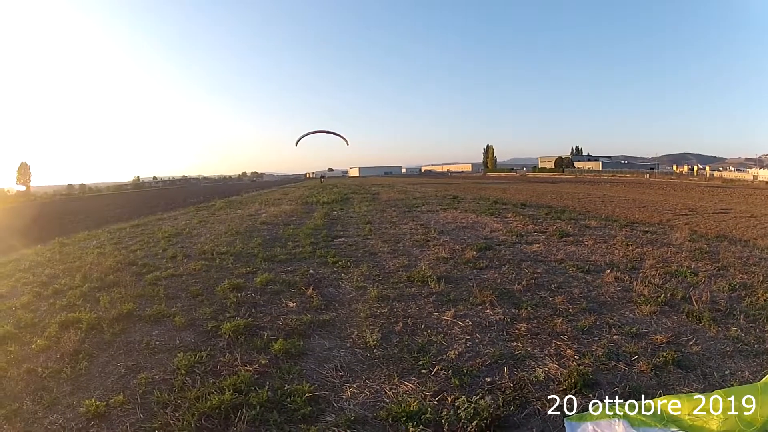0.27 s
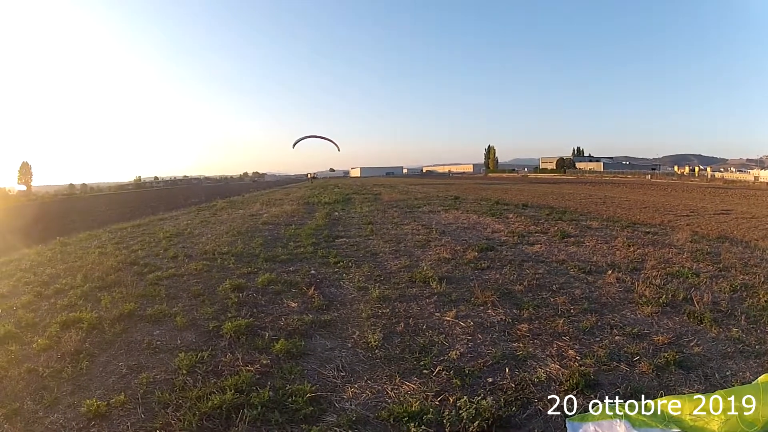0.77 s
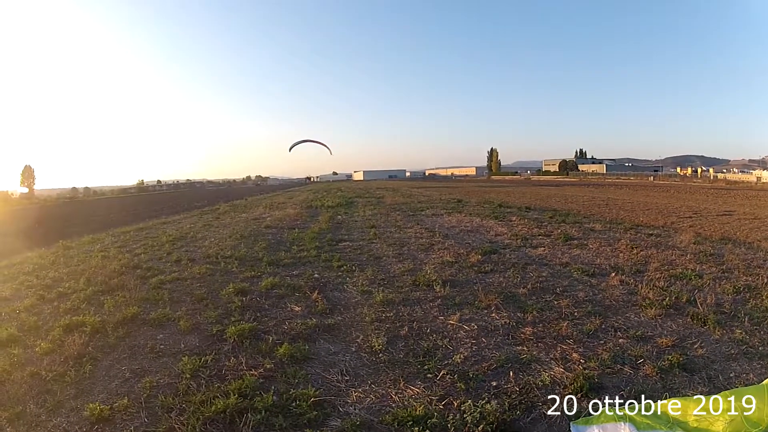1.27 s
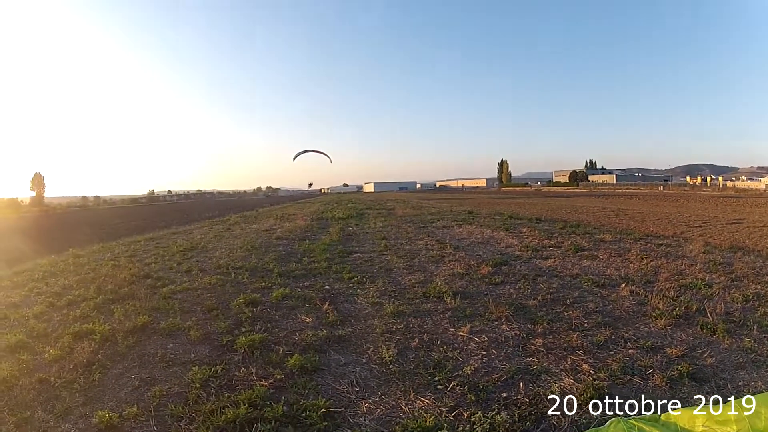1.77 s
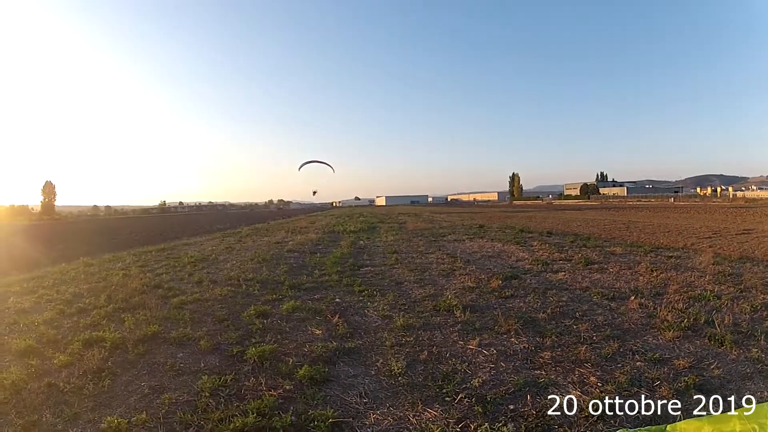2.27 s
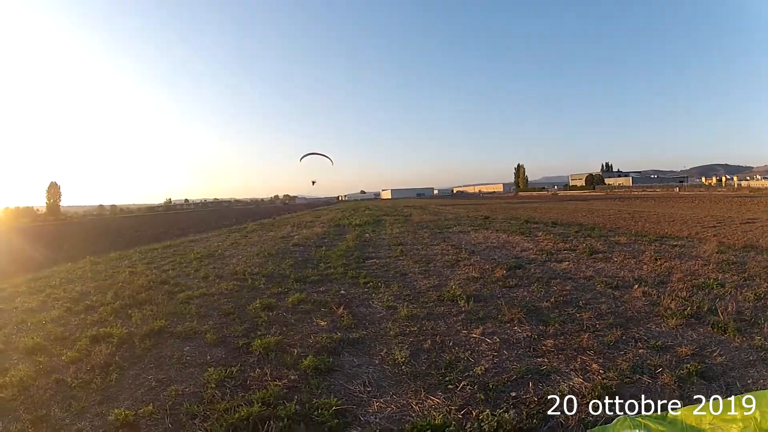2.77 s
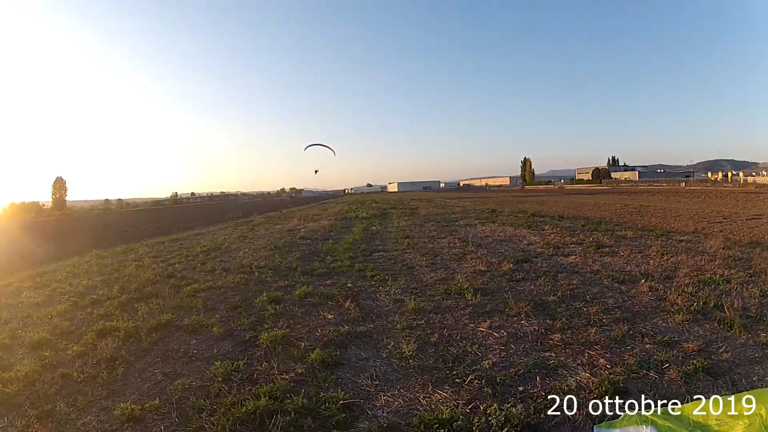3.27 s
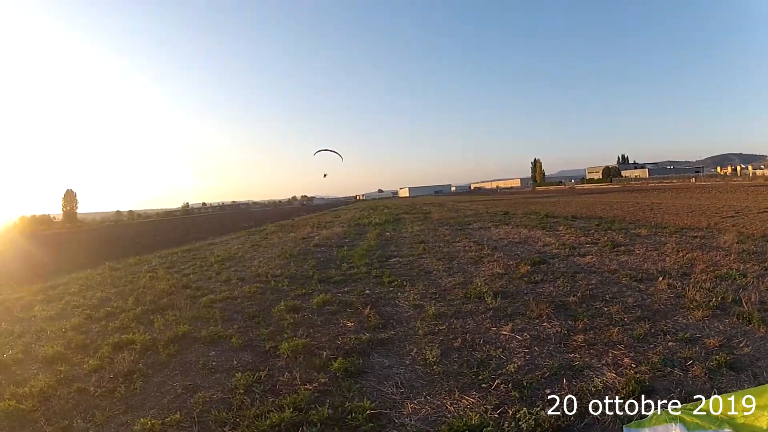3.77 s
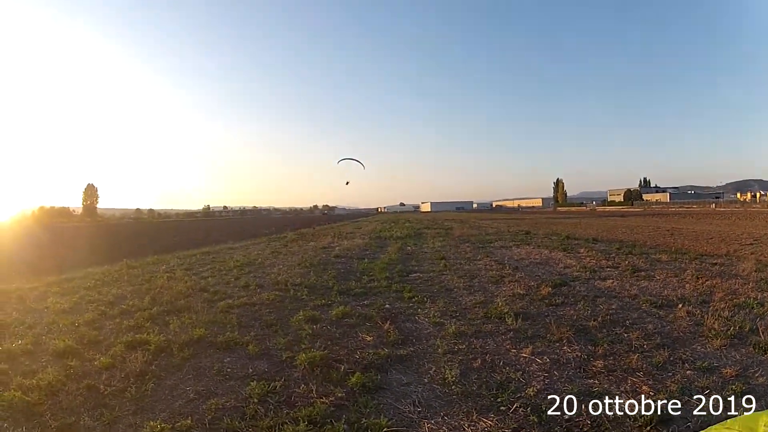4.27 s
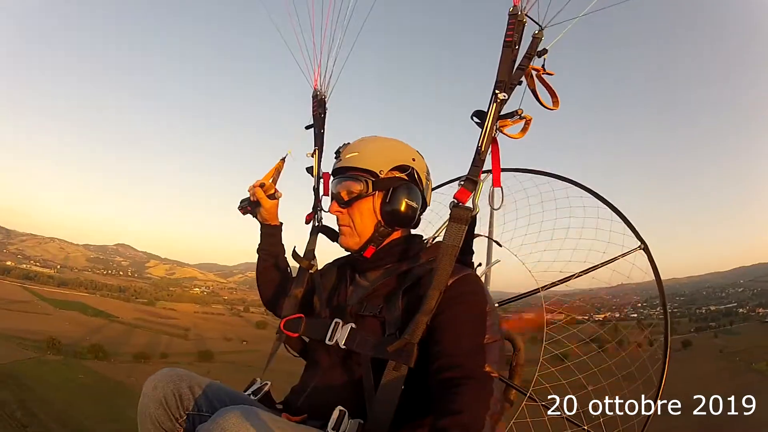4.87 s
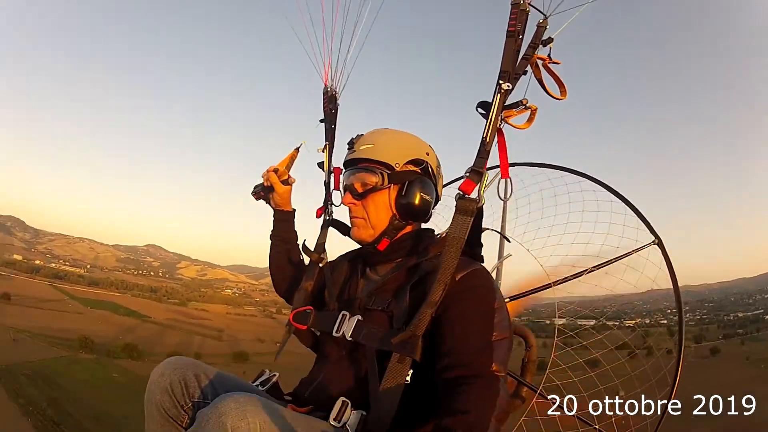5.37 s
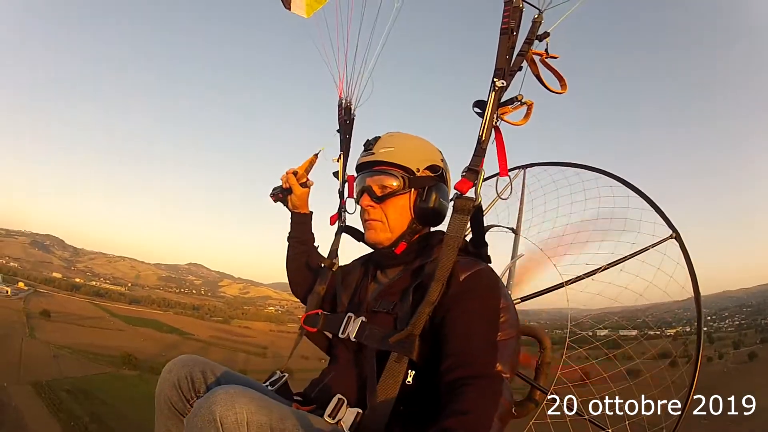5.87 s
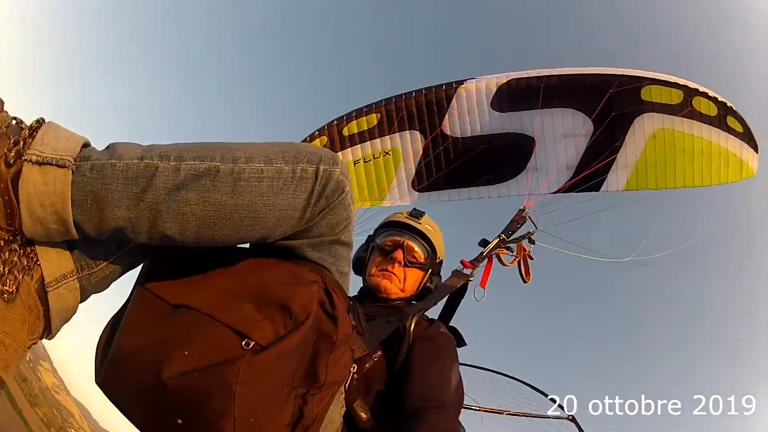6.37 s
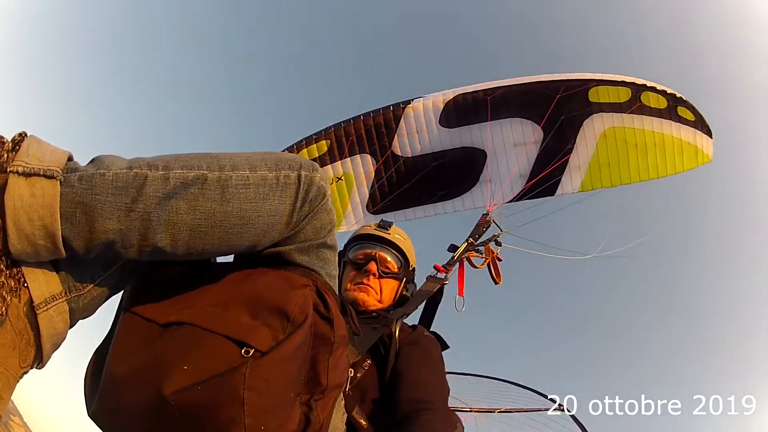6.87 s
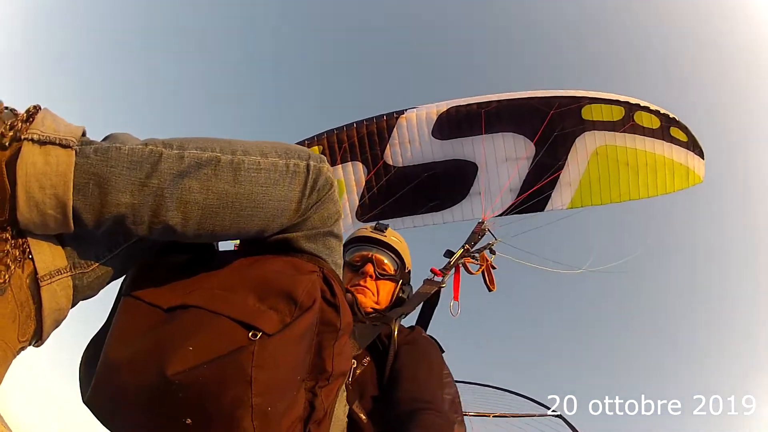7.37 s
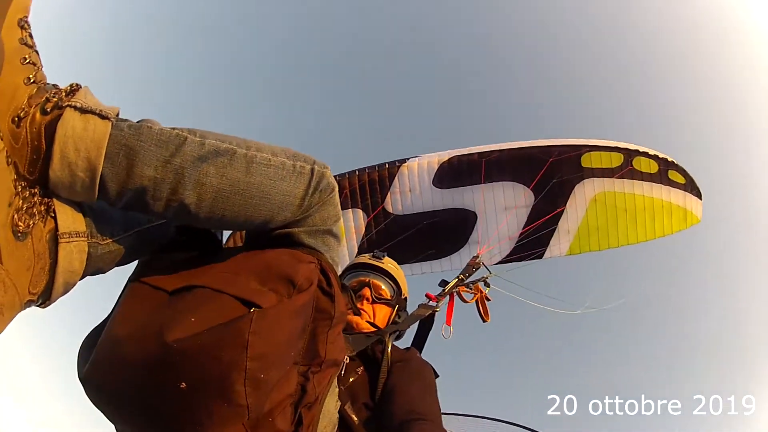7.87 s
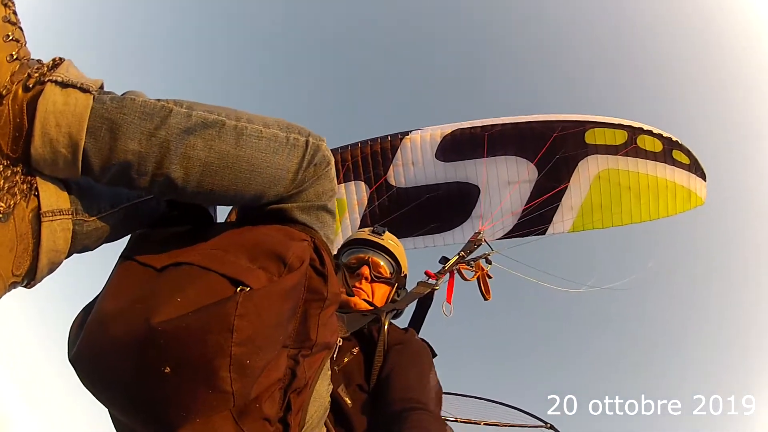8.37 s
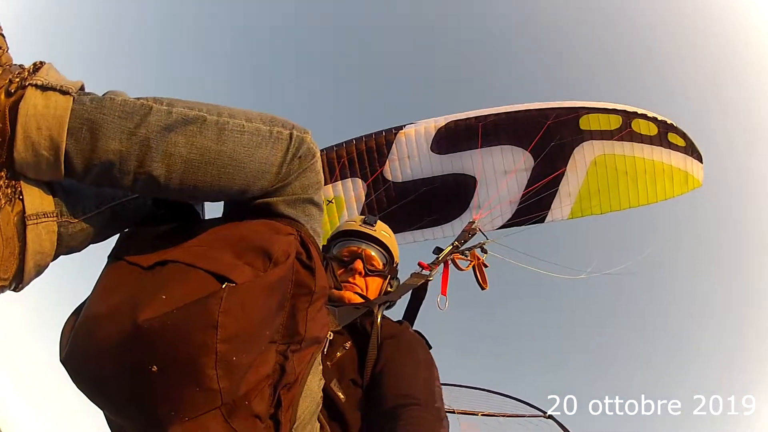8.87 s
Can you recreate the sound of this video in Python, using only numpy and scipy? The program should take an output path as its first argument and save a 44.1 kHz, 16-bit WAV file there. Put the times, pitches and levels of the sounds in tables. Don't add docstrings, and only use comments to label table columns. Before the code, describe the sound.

From 0 to about 4.6 s a two-stroke paramotor flies away over a field. Its rapid propeller buzz, near ninety blade beats a second, is raspy and hissy, with a hollow, shifting colour from ground reflection. It rises very slightly until about 2.2 s, while tones swell and fade; dry snapping blade cracks stand out around 2.4-3.3 s, densest near 2.7 s. It then thins with distance and sags in pitch to 4.5 s. At 4.6 s it cuts abruptly to a much louder close engine beside the pilot: lower, steady, dense and rattling, its low thrum building slightly. At 6.2 s another quick cut moves to the foot: deep blade hum dominates, with duller mids and strongly pulsing, fluttering air wash, steady until the end at 9.1 s. The camera microphone sounds gritty, with metallic mirrored treble and mild overload.

```python
import sys
import numpy as np
from scipy import signal
from scipy.fft import next_fast_len
from scipy.io import wavfile
from scipy.ndimage import uniform_filter1d

SR = 44100
rng = np.random.default_rng(int(sys.argv[2]) if len(sys.argv) > 2 else 0)


def linear_from_db(decibels):
    return 10 ** (np.asarray(decibels, float) / 20)


def store_pcm(level_fs):
    pcm = np.round(np.clip(level_fs, -1, 1) * 32767).astype(np.int16)
    wavfile.write(sys.argv[1], SR, np.atleast_2d(pcm).T)


N = 402191

CUTS_S = [0, 4.564, 6.232, 9.12]
# time_s, distance_loss_db, tail_on_share (0-1)
FAR_PATH = [
    (0, 0, 0.2),
    (.5, -2.5, 0.01),
    (1.1, -8, 0.01),
    (1.5, -7, 0.47),
    (2.2, -6.5, 0.03),
    (2.8, -10.5, 0.68),
    (3.3, -13, 1.05),
    (3.8, -17.5, 0.93),
    (4.56, -19.5, 0.44),
]
# time_s, firings_per_blade_pass
NEAR_GEAR = [(4.56, 1.8), (9.12, 1.8)]
HELD_HZ, EDIT_HZ = 12000, 48000
FAR_SMEAR = .14


def columns(rows, t):
    s, *values = np.transpose(rows)
    return np.array([np.interp(t, s, v) for v in values])


def drift(size, rate):
    r = np.exp(-40 * np.pi * rate / SR)
    slow = signal.lfilter([1], [1, -2 * r, r * r], rng.standard_normal(size // 20 + 1502))[1500:]
    return np.interp(np.arange(size) / 20, np.arange(len(slow)), slow / slow.std())


def turning(hz, start=0):
    angle = 2 * np.pi * np.cumsum(hz) / SR
    return angle - angle[start]


def swell_db(level, hz):
    region_hz = [150, 900, 1700, 2250, 3500]
    regions = np.arange(len(region_hz))
    place = np.interp(np.log(hz), np.log(region_hz), regions)
    share = np.maximum(1 - np.abs(place - regions), 0)
    return share @ level - share @ level.mean(axis=1)


def far_level(t):
    # pitch_hz, share_of_distance_loss, tail_on_lift_db, gust_lift_db
    answer = [(150, 0.42, -2, -4.5), (900, 0.75, 0, 7), (1700, 1, 3.5, -9.5), (2250, 0.7, 6, .3),
              (3500, 0.76, 5.5, -0.2)]
    gust_s, gust_width_s = 2.01, 0.14
    loss_db, tail = columns(FAR_PATH, t)
    gust = np.exp(-.5 * ((t - gust_s) / gust_width_s) ** 2)
    return np.array(answer)[:, 1:] @ np.array([loss_db, tail, gust])


def building(rates, t):
    return np.outer(np.array(rates)[:, 1], t - t[0])


def ground_echo(x, t):
    # time_s, lag_ms, phase_turns, echo_db
    reflection = [
        (0, 1.03, 0.068, -3),
        (1.0, 1.06, 0.012, -1),
        (1.9, 0.99, 0.048, -6.5),
        (2.15, 0.9, 0.12, -9),
        (2.4, 0.84, 0.14, -6),
        (2.85, 0.74, 0.37, -4.5),
        (3.5, 0.812, 0.26, -5.5),
        (4.1, 0.76, 0.47, -6.5),
        (4.56, 0.84, 0.23, -10),
    ]
    lag_ms, turns, echo_db = columns(reflection, t)
    analytic = signal.hilbert(x, next_fast_len(len(x)))[:len(x)]
    turned = np.real(analytic * np.exp(-2j * np.pi * turns))
    echo = linear_from_db(echo_db) * np.interp(t - lag_ms / 1000, t, turned)
    return (x + echo) / np.sqrt(1 + linear_from_db(2 * echo_db))


def shaded(x, tail):
    centre_hz, width_hz, share = 1720, 600, .85
    band = signal.lfilter(*signal.iirpeak(centre_hz, centre_hz / width_hz, fs=SR), x)
    return x - np.clip(share * tail, 0, 1) * band


def wash(angle, spectrum, level, throb_db, twice, uneven_db, patchy_db):
    size = len(angle)
    turn = angle / (2 * np.pi) + .5 - np.floor(angle[0] / (2 * np.pi))
    strength = rng.standard_normal(int(turn[-1]) + 2)[turn.astype(int)]
    peak = (.5 + .5 * np.cos(angle)) ** 2
    throb = throb_db * (np.cos(angle) + twice * np.cos(2 * angle)) + uneven_db * strength * peak
    gust = drift(size, 23.0) + 0.3 * drift(size, 220.0)
    white = rng.standard_normal((2, size))
    edges = 35 * 2 ** np.arange(0, 7.5, 1 / 3)
    spectrum_hz, spectrum_db = np.transpose(spectrum)
    out = 0
    for k, (low, high) in enumerate(zip(edges, edges[1:])):
        hz = np.sqrt(low * high)
        bright = np.interp(np.log2(hz), np.log2([60, 2200, 5000]), [0, 1, .7])
        db = np.interp(np.log(hz), np.log(spectrum_hz), spectrum_db) + swell_db(level, hz)
        db = db + bright * (throb + patchy_db * gust) + patchy_db * drift(size, 2.5)
        third_octave = signal.butter(2, [low, high], "band", fs=SR, output="sos")
        out = out + linear_from_db(db) * signal.sosfilt(third_octave, white[k % 2])
    return out / out.std()


def slaps(t, blade, level_db):
    # time_s, extra_db
    hard_passes = [
        (2.4136, 3),
        (2.5019, 9),
        (2.7115, 9),
        (2.7343, 10),
        (2.7453, 12),
        (2.768, 7),
        (2.9119, 8),
        (3.09, 4),
        (3.1679, 1),
        (3.3144, 0),
    ]
    uneven_db, jitter_s = 1.5, .00003
    low_hz, high_hz = 2000, 2450
    at = t[np.flatnonzero(np.diff(np.floor(blade / (2 * np.pi))))]
    chance = rng.standard_normal((len(at), 2))
    db = np.interp(at, t, level_db) + uneven_db * chance[:, 0]
    for s, extra_db in hard_passes:
        db[np.argmin(np.abs(at - s))] += extra_db
    clicks = np.zeros(len(t))
    where = np.searchsorted(t, at + jitter_s * chance[:, 1])
    clicks[np.clip(where, 0, len(t) - 1)] = -linear_from_db(db)
    ring = signal.butter(2, [low_hz, high_hz], "band", fs=SR, output="sos")
    band = signal.sosfilt(ring, clicks + 1e-18)
    return band * np.sqrt(SR ** 2 / 90 / (high_hz - low_hz) / 2)


def beams(t, blade):
    # blade_multiple, start_s, end_s, level_db (rms)
    sweeps = [(1, -1, 5, -33.5), (1, .3, 2.6, -34.5), (2, -1, 2.9, -36), (2, .25, .7, -33),
              (2, 1.05, 2.45, -33), (2, 3.17, 3.58, -32), (2, 3.75, 4.1, -33), (2, 4.1, 5, -44),
              (4, .15, 3.85, -39), (4, 3.85, 5, -46), (5, -1, .65, -41), (5, -1, 2.55, -45),
              (5, 1.3, 2.45, -49), (5, 2.95, 3.5, -42), (5, 3.5, 5, -45), (6, 2.15, 3.25, -42),
              (6, 3.3, 4.2, -51), (7, -1, .6, -40), (7, 1.15, 2.4, -37), (7, 3.0, 3.8, -49),
              (8, .15, 2.35, -39), (8, 2.4, 3.9, -47), (9, -1, 2.85, -39), (9, 1.5, 2.8, -44),
              (9, 2.9, 5, -46), (10, -1, .6, -33), (10, .6, 3.8, -47), (11, -1, .2, -34),
              (11, .2, 3.5, -46), (11, 2.35, 3.05, -41)]
    edge_s, waver_db = .25, 1.5
    out, coarse = 0, t[::64]
    for k in sorted({row[0] for row in sweeps}):
        lit = 0
        for multiple, start, end, db in sweeps:
            if multiple == k:
                inside = np.clip(np.minimum(coarse - start, end - coarse) / edge_s + .5, 0, 1)
                lit = lit + linear_from_db(db) * np.sin(np.pi / 2 * inside) ** 2
        gain = np.interp(t, coarse, lit) * linear_from_db(waver_db * drift(len(t), 3.1))
        out = out - np.sqrt(2) * gain * np.cos(k * blade + FAR_SMEAR * k * k)
    return out


def tones(angle, table, level, smear, waver_db):
    out = 0
    hz = (angle[-1] - angle[0]) * SR / len(angle) / (2 * np.pi)
    angle = angle + 0.032 * drift(len(angle), 5.3)
    for k, db in table:
        waver = waver_db * k ** 0.092 * drift(len(angle), 1.93)
        gain = linear_from_db(db + swell_db(level, k * hz) + waver)
        out = out - np.sqrt(2) * gain * np.cos(k * angle + smear * k * k)
    return out


def paramotor(t, blades, gear, level, blade_tones, firing_tones, spectrum, wash_db, smear, chop, waver_db,
              throb_db, twice, uneven_db, patchy_db, start=0):
    passes = columns(blades, t)[0]
    blade = turning(passes, start)
    firing = turning(passes * columns(gear, t)[0])
    chopped = 1 + chop * (np.cos(blade) + .5 * np.cos(2 * blade))
    exhaust = tones(firing, firing_tones, level, 0.99, waver_db) * chopped
    hiss = linear_from_db(wash_db) * wash(blade, spectrum, level, throb_db, twice, uneven_db, patchy_db)
    return tones(blade, blade_tones, level, smear, waver_db) + exhaust, hiss


def climbing_away(t):
    # time_s, blade_pass_hz
    blades = [
        (0.0, 90.3),
        (0.25, 90.4),
        (0.86, 91.5),
        (2.22, 91.68),
        (3.11, 89.3),
        (3.5, 87.45),
        (3.9, 83.14),
        (4.52, 80.0),
        (4.56, 81.1),
    ]
    # time_s, firings_per_blade_pass
    gear = [(0, 1.468), (2.5, 1.468), (3.5, 1.455), (4.56, 1.452)]
    # multiple, level_db (rms)
    blade_tones = [(3, -28.5), (12, -46.5), (13, -49), (14, -51), (15, -64.5), (16, -53.5)]
    firing_tones = [(1, -29.5), (2, -45.5)]
    # pitch_hz, density_db (per Hz)
    spectrum = [(40, -2), (70, -12), (200, 6), (450, 0.5), (800, -2.5), (1500, -2.5), (2200, 1.5),
                (3000, -5.5), (4000, -12), (5200, -14.5), (5900, -28)]
    tail, level = columns(FAR_PATH, t)[1], far_level(t)
    start = np.searchsorted(t, 2.7455)
    chop = 0.29 + (0.36 - 0.29) * np.clip(tail, 0, 1)
    hum, hiss = paramotor(t, blades, gear, level, blade_tones, firing_tones, spectrum, wash_db=-29.5,
                          smear=FAR_SMEAR, chop=chop, waver_db=.8, throb_db=2 - 0.13 * tail, twice=1,
                          uneven_db=1.5, patchy_db=0.2, start=start)
    blade = turning(columns(blades, t)[0], start)
    cracks = slaps(t, blade, -45 + swell_db(level, 2000) + 7.5 * tail)
    high_pass = signal.butter(3, 66, "high", fs=SR, output="sos")
    hum = signal.sosfiltfilt(high_pass, hum + beams(t, blade))
    return hum + ground_echo(shaded(hiss, tail) + cracks, t)


def beside_pilot(t):
    # time_s, blade_pass_hz
    blades = [(4.56, 66.45), (5.1, 66.24), (5.7, 66.4), (6.23, 66.3)]
    # pitch_hz, rate_db_per_s
    build = [(150, 2.1), (900, -.2), (1700, 1.5), (2250, -0.3), (3500, .1)]
    # multiple, level_db (rms)
    blade_tones = [(1, -19.5), (2, -23.5), (3, -28.5), (4, -20.5), (5, -20), (6, -25), (7, -20.5),
                   (8, -35.5), (9, -36), (10, -26), (11, -44), (12, -38), (13, -50), (14, -34), (15, -45),
                   (16, -60), (17, -37), (18, -41), (19, -40.5), (20, -43), (21, -61), (22, -41)]
    firing_tones = [(1, -28.5), (2, -57), (3, -22), (4, -34), (5, -43), (6, -30.5), (7, -44), (8, -42),
                    (9, -43), (10, -41), (11, -34.5), (12, -81)]
    # pitch_hz, density_db (per Hz)
    spectrum = [(40, -10), (90, -8), (200, 0), (400, 3), (700, -2), (1050, -17), (1600, -10.5), (2500, -10),
                (3200, -17.5), (5200, -23.5), (5900, -32)]
    hum, hiss = paramotor(t, blades, NEAR_GEAR, building(build, t), blade_tones, firing_tones, spectrum,
                          wash_db=-15.5, smear=.7, chop=0.15, waver_db=0.03, throb_db=3.0, twice=0.57,
                          uneven_db=0.0, patchy_db=0.9)
    return hum + hiss


def at_the_foot(t):
    # time_s, blade_pass_hz
    blades = [(6.23, 66.84), (7.0, 67.5), (9.12, 67.28)]
    # pitch_hz, rate_db_per_s
    build = [(150, .6), (900, -0.29), (1700, -0.28), (2250, 0.19), (3500, 0.6)]
    # multiple, level_db (rms)
    blade_tones = [(1, -14.5), (2, -17.5), (3, -22.5), (4, -31.5), (5, -25), (6, -31), (7, -31), (8, -31.5),
                   (9, -38.5), (10, -47), (11, -28.5), (12, -38), (13, -51.5), (14, -55), (15, -40),
                   (16, -44), (17, -45.5), (18, -81), (19, -59), (20, -40), (21, -80), (22, -40)]
    firing_tones = [(1, -28), (2, -38.5), (3, -25.5), (4, -30.5), (5, -32), (6, -36.5), (7, -41), (8, -67),
                    (9, -59), (10, -42), (11, -56), (12, -62)]
    # pitch_hz, density_db (per Hz)
    spectrum = [(40, -14.5), (90, -3.5), (170, 0), (400, -3), (700, -6), (1000, -23), (1600, -19),
                (2600, -16), (3200, -23.5), (5200, -28), (5900, -38)]
    hum, hiss = paramotor(t, blades, NEAR_GEAR, building(build, t), blade_tones, firing_tones, spectrum,
                          wash_db=-12.5, smear=.15, chop=0.48, waver_db=0.76, throb_db=4.5, twice=0.1,
                          uneven_db=1.5, patchy_db=0.62)
    return hum + hiss


def scene():
    t = np.arange(N) / SR
    far, side, foot = np.split(t, np.searchsorted(t, CUTS_S[1:3]))
    parts = [climbing_away(far), beside_pilot(side), at_the_foot(foot)]
    first_join, second_join = np.abs(t - CUTS_S[1]) / 0.0027, np.abs(t - CUTS_S[2]) / 0.0057
    fade = np.clip(np.minimum(first_join, second_join), .1, 1)
    return (np.concatenate(parts) * fade)[None]


def ragged_top(x):
    t = np.arange(x.shape[1]) / HELD_HZ
    far_ready = -2.4 + 1.8 * columns(FAR_PATH, t)[1]
    ready = np.select([t < CUTS_S[1], t < CUTS_S[2]], [far_ready, .7], 0.0)
    for k, edge_hz in enumerate([5830, 5620, 5400]):
        below = signal.sosfiltfilt(signal.cheby2(6, 30, edge_hz, fs=HELD_HZ, output="sos"), x)
        kept = drift(x.shape[1], 40.0) + ready + 1.1 * k > 0
        x = below + (x - below) * uniform_filter1d(np.maximum(kept, .1), size=250)
    return x


def low_pass(x):
    return signal.sosfilt(signal.butter(12, 16330, fs=SR, output="sos"), x)


def record(dry):
    narrow = signal.sosfilt(signal.cheby2(8, 28, 6050, fs=SR, output="sos"), dry)
    step = EDIT_HZ // HELD_HZ
    sampled = signal.resample_poly(narrow, 160, 147, axis=1)[:, ::step]
    rounded = sampled / (1 + np.abs(sampled / .96) ** 6) ** (1 / 6)
    stairs = np.repeat(ragged_top(rounded), step, axis=1)
    held = signal.resample_poly(stairs, 147, 160, axis=1)[:, :N]
    held = np.pad(held, ((0, 0), (0, N - held.shape[1])))
    held = signal.sosfilt(signal.cheby2(12, 50, 15700, fs=SR, output="sos"), held)
    return low_pass(held)


dry = scene()
out = record(dry)
store_pcm(out)
```